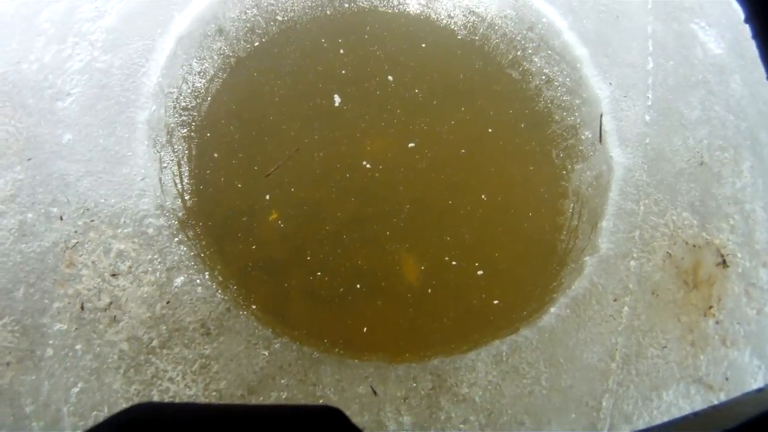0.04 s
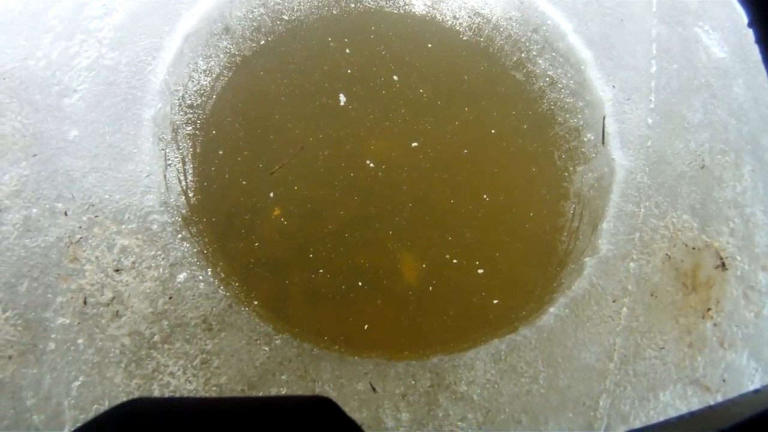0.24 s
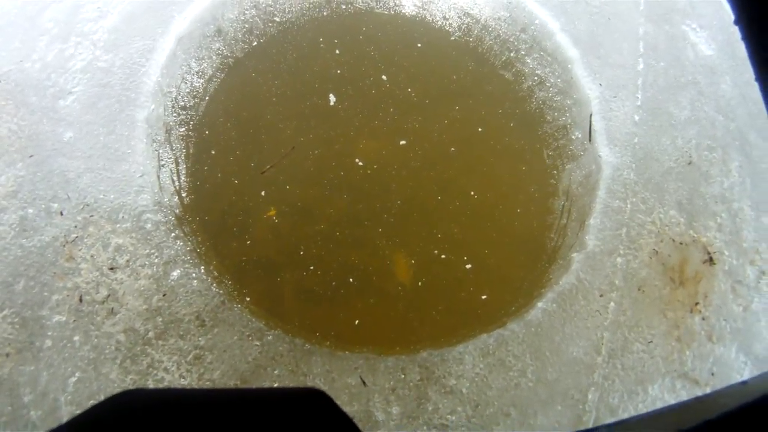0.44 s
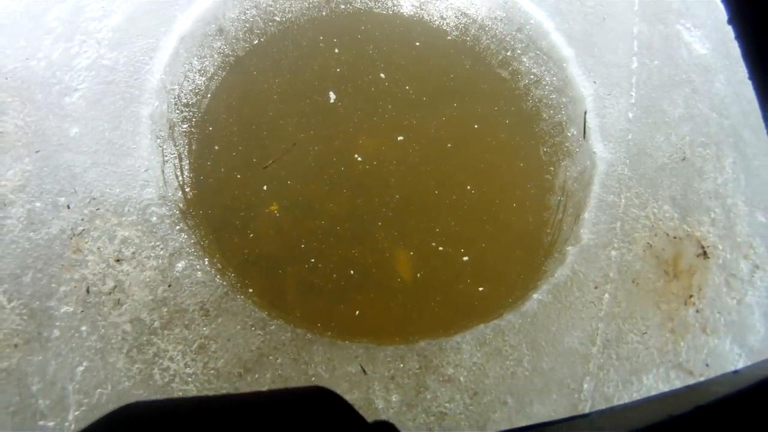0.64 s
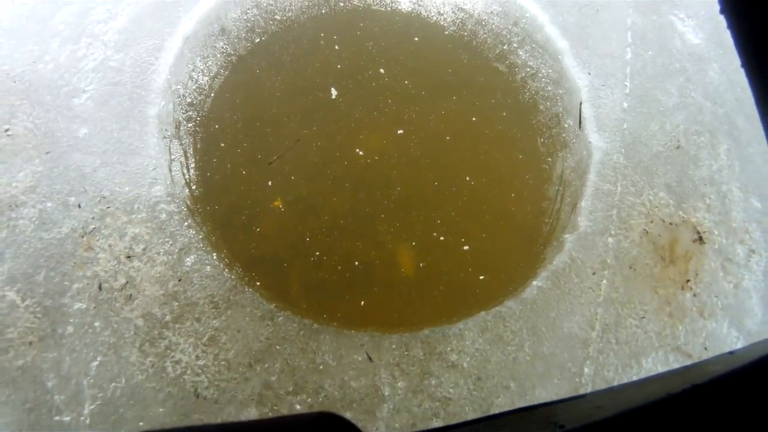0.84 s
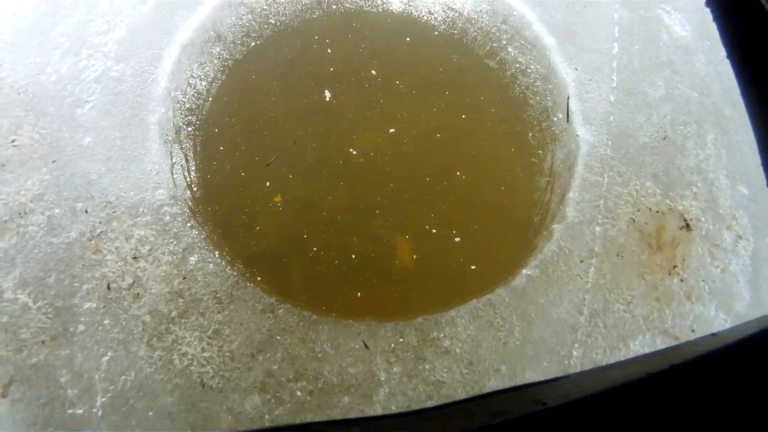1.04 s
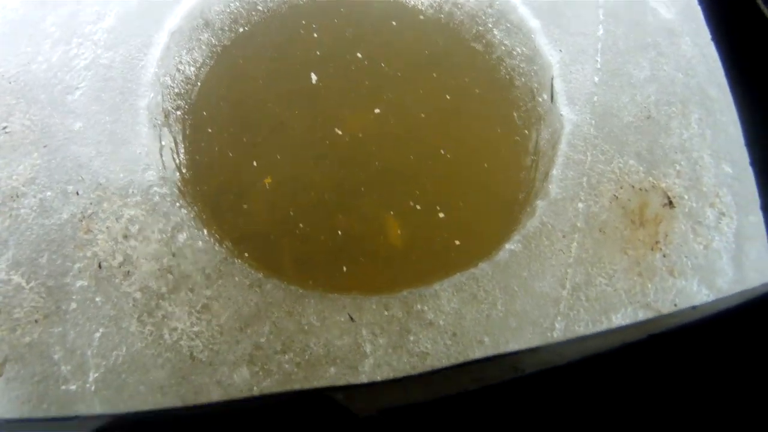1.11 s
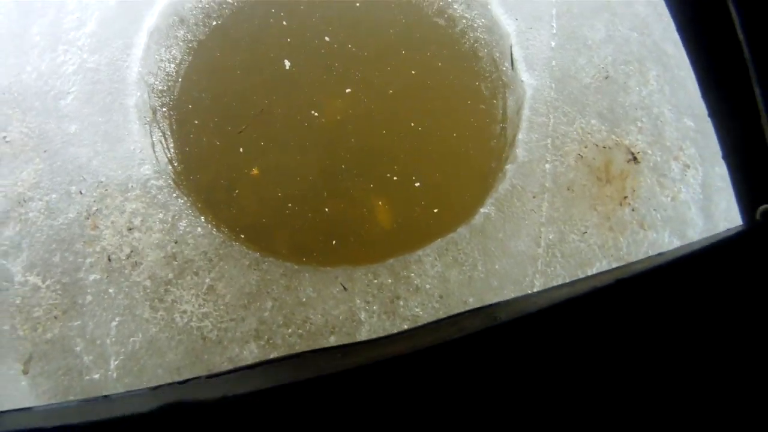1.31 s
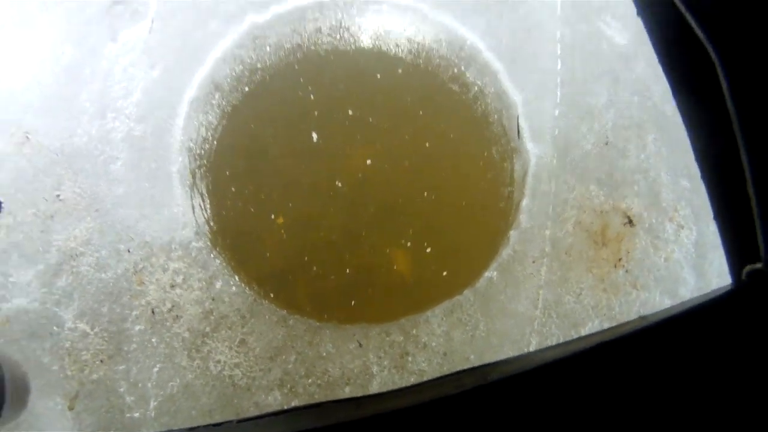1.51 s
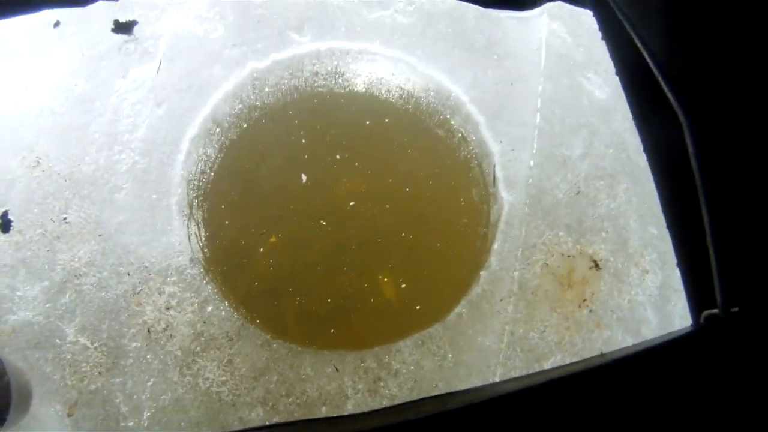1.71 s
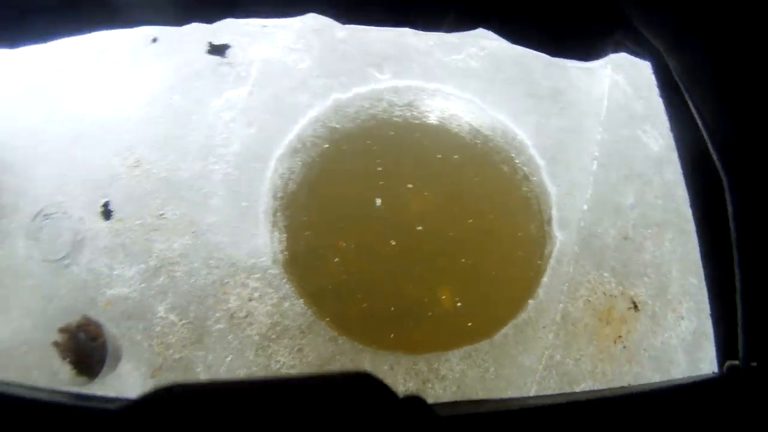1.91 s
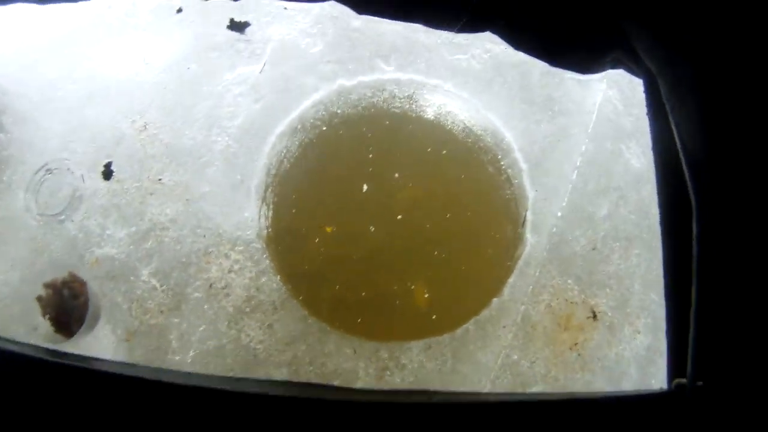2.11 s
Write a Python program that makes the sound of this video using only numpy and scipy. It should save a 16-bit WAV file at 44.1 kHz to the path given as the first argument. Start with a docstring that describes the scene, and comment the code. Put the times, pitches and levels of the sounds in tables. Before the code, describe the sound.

A camera is bumped with one sharp knock and a very brief rattle. Small ticks, soft finger thuds and rustling follow as it is picked up, heard point-blank on its own microphone beside an ice hole, over faint hiss.

```python
"""A camera bumped beside a hole in the ice, heard point-blank on its own microphone.
The housing cracks once, rebounds and rattles briefly. The camera is then picked up: small ticks,
soft finger thuds and a rustle that rubs through the housing, over handling rumble and hiss.
The recorder samples slowly and holds each sample, which mirrors the sound into the treble."""
import sys
import numpy as np
from scipy import signal
from scipy.fft import rfft, irfft, next_fast_len
from scipy.io import wavfile
from scipy.ndimage import map_coordinates

SR = 44100
rng = np.random.default_rng(int(sys.argv[2]) if len(sys.argv) > 2 else 0)


def to_wav(s):
    """Save 16-bit WAV."""
    ch = np.atleast_2d(s).T  # columns
    pcm = np.round(np.clip(ch, -1, 1) * 32767)  # PCM
    wavfile.write(sys.argv[1], SR, pcm.astype(np.int16))


N = 94815


def amp(db):
    """Decibels to gain."""
    return 10 ** (np.asarray(db) / 20)


def unit(x):
    """Scale to rms 1."""
    return x / np.sqrt(np.mean(x ** 2) + 1e-20)


def gain_at(spectrum, hz):
    """Gain at hz, read from rows of frequency_hz, level_db on a log frequency axis."""
    frequency_hz, level_db = np.transpose(spectrum)
    return amp(np.interp(np.log(hz + 1), np.log(frequency_hz + 1), level_db))


def curve(rows):
    """Join rows of time_s, level_db into one level per sample."""
    return np.interp(np.arange(N) / SR, *np.transpose(rows))


def wobble(knots_per_s):
    """A smooth random curve."""
    knots = rng.standard_normal(int(N * knots_per_s / SR) + 4)
    return map_coordinates(knots, [np.arange(N) * knots_per_s / SR])


def filtered(x, response):
    """Pass x through a frequency response."""
    size = next_fast_len(N + SR // 2)
    return irfft(rfft(x, size) * response(np.fft.rfftfreq(size, 1 / SR)), size)[:N]


def noise(spectrum):
    """Coloured noise of rms 1."""
    return unit(filtered(rng.standard_normal(N), lambda hz: gain_at(spectrum, hz)))


def pulse(response, size=4096):
    """The minimum-phase pulse with this magnitude response, scaled to peak 1."""
    magnitude = np.maximum(response(np.fft.rfftfreq(size, 1 / SR)), 1e-4)
    cepstrum = irfft(np.log(magnitude))
    cepstrum[1:size // 2] *= 2
    cepstrum[size // 2 + 1:] = 0
    wave = irfft(np.exp(rfft(cepstrum)))
    return wave / np.abs(wave).max()


def contact(body, scrape_s, size=2048):
    """One push and a dying scrape of equal energy drive the body's impulse response; peak 1."""
    force = rng.standard_normal(size) * np.exp(-np.arange(size) / SR / scrape_s)
    force /= np.linalg.norm(force)
    force[0] += 1
    sound = signal.fftconvolve(force, body)
    return sound / np.abs(sound).max()


def add(track, start_s, sound):
    """Mix a sound in at start_s."""
    part = track[max(round(start_s * SR), 0):][:len(sound)]
    part += sound[:len(part)]


def housing(hz):
    """Complex response of the resonant shell around the microphone."""
    # shell resonances: centre_hz, width_hz, level_db
    modes = [(565, 72, -4.5), (860, 48, -8.5), (1956, 81, 0.5), (2700, 98, -9), (3564, 56, -5)]
    return sum(amp(level_db) * 1j * hz * width_hz / (centre_hz ** 2 - hz ** 2 + 1j * hz * width_hz)
               for centre_hz, width_hz, level_db in modes)


def rumble():
    """Low handling noise that swells as the camera moves."""
    # swell of the rumble, before the trim: time_s, level_db
    swell = [(0, -56), (.2, -56), (.4, -58), (.8, -53.5), (1.15, -54.5), (1.32, -56), (1.45, -54.5),
             (1.66, -45.5), (1.76, -58.5), (1.81, -47.5), (1.87, -51.5), (1.97, -43.5), (2.07, -40.5),
             (2.15, -51)]
    # colour of the rumble: frequency_hz, level_db
    spectrum = [(12, -17), (20, 5), (70, 2), (123, -12.5), (209, -12), (268, -17.5), (300, -42),
                (390, -14.5), (660, -120)]
    trim_db = -3
    return amp(curve(swell) + trim_db) * noise(spectrum)


def hiss():
    """A faint steady hiss in the centre, and a trace of each channel's own."""
    # hiss common to both channels: frequency_hz, level_db
    common = [(100, -1), (400, -7.5), (950, -11.5), (1500, -15), (3400, -18), (5600, -21), (7300, -26)]
    # hiss of one channel: frequency_hz, level_db
    channel = [(59, -28), (100, -12), (415, -1.5), (859, -8.5), (4730, -1), (5970, 2), (7000, -10),
               (9100, -36), (15400, -120)]
    return amp(-61.5) * noise(common) + amp(-76) * np.array([noise(channel), noise(channel)])


def rustle():
    """Dense friction grains right at the microphone, heard partly through the housing's resonances."""
    # colour of the friction: frequency_hz, level_db
    spectrum = [(120, -49), (200, -2.5), (240, -14.5), (304, -21.5), (546, -9), (711, -7), (853, -5.5),
                (1230, -8), (1640, -12), (2000, -12), (2170, -8.5), (3070, -24), (3580, -17), (3840, -21.5),
                (5600, -84), (7280, -75), (12300, -120)]
    # strength of the rubbing: time_s, level_db
    rubbing = [(0, -59.5), (.18, -65), (.33, -73.5), (.68, -72.5), (.8, -64), (.92, -70), (1.08, -67),
               (1.22, -65.5), (1.32, -54.5), (1.375, -56.5), (1.41, -67.5), (1.49, -52), (1.54, -57),
               (1.63, -55.5), (1.69, -57.5), (1.76, -68.5), (1.86, -58), (1.9, -53.5), (1.925, -45),
               (1.968, -57.5), (1.992, -43.5), (2.01, -56.5), (2.045, -49), (2.07, -43), (2.09, -49.5),
               (2.125, -44), (2.15, -52)]
    grains_per_s, flutter_db = 5000, 2
    grains = rng.standard_normal(N) * (rng.random(N) < grains_per_s / SR)
    direct = unit(filtered(grains, lambda hz: gain_at(spectrum, hz)))
    ring = unit(filtered(grains, housing))
    level_db = curve(rubbing) + flutter_db * wobble(knots_per_s=90)
    return unit(direct + amp(-6) * ring) * amp(level_db)


def ticks():
    """Small hard contacts that scrape briefly and ring the housing."""
    # ticks on the housing: start_s, peak_db, scrape_s, ring_db
    touches = [(0.018, -43.5, 0.0034, -13), (0.0354, -44, 0.0022, -17), (0.0672, -36.5, 0.0073, -32),
               (0.0713, -45, 0.0014, -23), (0.1042, -38.5, 0.0046, -31), (0.149, -46.5, 0.0029, -15),
               (0.1694, -28, 0.0015, -14), (0.483, -44.5, 0.0055, -12), (.748, -48.5, 0.0035, -5),
               (0.79, -56, .004, -6), (1.008, -44, 0.0037, -1), (1.015, -52, 0.0031, 0),
               (1.042, -42, .006, 2), (1.0472, -35.5, 0.0011, -3.5), (1.087, -43, 0.006, -2.5),
               (1.095, -46.5, 0.0023, -9), (1.148, -46, .004, 0.5), (1.192, -42.5, 0.0066, -13),
               (1.3103, -42, 0.00075, -22), (1.498, -48, 0.0034, 5), (1.558, -38, .003, -1),
               (1.586, -42.5, 0.0056, -7), (1.606, -44, 0.0016, -8), (1.917, -43, 0.0028, -6),
               (2.021, -34, 0.0035, 1), (2.066, -28.5, 0.0029, 2), (2.07, -29, 0.0026, 3)]
    # colour of a hard contact: frequency_hz, level_db
    spectrum = [(150, -33), (250, -17), (455, -25), (546, -1.5), (655, -7), (838, -3), (1650, -3),
                (1980, -8.5), (2170, -3), (3690, -18.5), (5600, -23), (7280, -56), (12300, -120)]
    click = pulse(lambda hz: gain_at(spectrum, hz))
    ring = pulse(lambda hz: np.abs(housing(hz)))
    out = np.zeros(N)
    for start_s, peak_db, scrape_s, ring_db in touches:
        add(out, start_s, amp(peak_db) * contact(click + amp(ring_db) * ring, scrape_s))
    return out


def finger_thuds():
    """Soft fingers land on the camera: dull contacts, each with a brief ringing note."""
    # finger contacts: start_s, peak_db, cutoff_hz, ring_hz, ring_db
    touches = [(0.0213, -38, 900, 690, -2), (.169, -30.5, 1800, 910, -12), (1.314, -43.5, 1400, 1140, 7),
               (1.559, -28.5, 1400, 1080, -14), (1.619, -36, 990, 925, -12), (1.6218, -30.5, 690, 560, -1),
               (1.990, -37.5, 1300, 1220, 0), (2.128, -37, 1400, 1135, 6)]
    # colour of a soft contact, before its low-pass: frequency_hz, level_db
    spectrum = [(35, -24), (70, -12), (180, 3.5), (400, -7.5), (600, -9.5), (1000, -3), (1300, -10.5),
                (1750, -20.5), (2400, -1), (3200, -16), (5000, -43)]
    ring_t60_s = 0.034
    out = np.zeros(N)
    for start_s, peak_db, cutoff_hz, ring_hz, ring_db in touches:
        thud = pulse(lambda hz: gain_at(spectrum, hz) / np.sqrt(1 + (hz / cutoff_hz) ** 4))
        t = np.arange(len(thud)) / SR
        ring = amp(ring_db - 60 * t / ring_t60_s) * np.sin(2 * np.pi * ring_hz * t)
        add(out, start_s, amp(peak_db) * contact(thud + ring, scrape_s=0.0065))
    return out


def judder():
    """A few low stick-slip cycles that swell quickly and fade."""
    # lurches of the camera in the grip: start_s, length_s, pitch_hz, level_db
    lurches = [(.168, 0.015, 85, -40), (1.620, 0.033, 175, -44), (2.02, 0.043, 207, -37)]
    out = np.zeros(N)
    for start_s, length_s, pitch_hz, level_db in lurches:
        t = np.arange(int(length_s * SR)) / SR
        envelope = amp(level_db) * np.sin(np.pi * np.sqrt(t / length_s))
        add(out, start_s, envelope * np.sin(2 * np.pi * pitch_hz * t))
    return out


def bump():
    """A hard crack and its rebounds; the mount rings and loose parts rattle until they settle."""
    # the blow and its rebounds: start_s, level_db
    blows = [(0.2169, -4.5), (0.2205, -41), (0.2284, -20)]
    # colour of the crack: frequency_hz, level_db
    crack_spectrum = [(50, -7), (95, 4.5), (200, -0.5), (480, -15), (700, -8), (1000, -0.5), (1350, 6),
                      (1700, 3.5), (2100, 7), (2350, 3), (2600, -7.5), (3200, -21), (3850, -14),
                      (4300, -34), (5000, -23.5), (5600, -35)]
    # modes of the camera mount: pitch_hz, level_db, t60_s
    mount_modes = [(87.3, -28.5, 0.15), (218, -71, 0.1354), (591, -38, 0.086), (933, -34, 0.094),
                   (1098, -68, .12), (1990, -32, 0.13)]
    # colour of the loose parts: frequency_hz, level_db
    rattle_spectrum = [(80, -5), (150, 0.5), (390, -10), (620, -7), (900, -7.5), (1400, -1.5), (1750, -7),
                       (2000, -0.5), (2330, -5), (2520, -17), (2800, -12), (3200, -27.5), (3900, -24),
                       (5600, -30.5)]
    out, t = np.zeros(N), np.arange(N) / SR
    crack = pulse(lambda hz: gain_at(crack_spectrum, hz))
    for start_s, level_db in blows:
        add(out, start_s, amp(level_db) * crack)
    ring = sum(amp(level_db - 60 * t / t60_s) * np.sin(2 * np.pi * pitch_hz * t)
               for pitch_hz, level_db, t60_s in mount_modes)
    fall_db_per_s, settle_s, extra_fall_db_per_s = 284, 0.051, 900
    rattle_db = -31.5 - fall_db_per_s * t - extra_fall_db_per_s * np.maximum(t - settle_s, 0)
    add(out, blows[0][0], ring + amp(rattle_db) * noise(rattle_spectrum))
    # the highs arrive a little later, so the crack chirps upward
    spread_s, knee_hz = 0.0029, 2100
    return filtered(out, lambda hz: np.exp(-2j * np.pi * spread_s * (np.hypot(hz, knee_hz) - knee_hz)))


def scene():
    """The camera's one microphone feeds both channels, over the hiss."""
    microphone = rumble() + rustle() + ticks() + finger_thuds() + judder() + bump()
    return microphone + hiss()


def record(dry):
    """Narrow-band input; holding each sample mirrors it about the hold rate; a steep cut above."""
    # treble colour of the recorder: frequency_hz, gain_db
    treble = [(6000, 0), (10000, 1), (14300, 1.5), (15000, 2.5), (15700, -14.5)]
    input_edge_hz, hold_hz, top_hz = 5460, 12000, 15750
    mirror = 1 + 2 * np.cos(2 * np.pi * hold_hz * np.arange(N) / SR)

    def output_response(hz):
        hold_droop = np.sinc(hz / hold_hz)
        return hold_droop * gain_at(treble, hz) * (hz < top_hz)

    narrow = [filtered(x, lambda hz: 1 / np.sqrt(1 + (hz / input_edge_hz) ** 50)) for x in dry]
    return np.array([filtered(x * mirror, output_response) for x in narrow])


dry = scene()
out = record(dry)
to_wav(out)
```